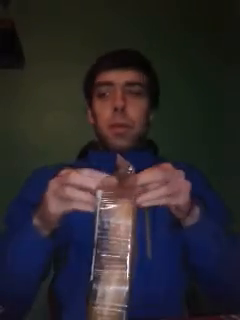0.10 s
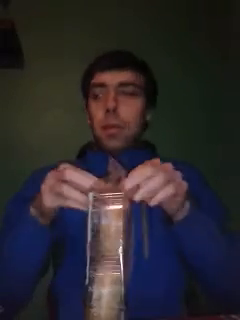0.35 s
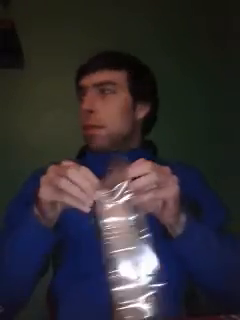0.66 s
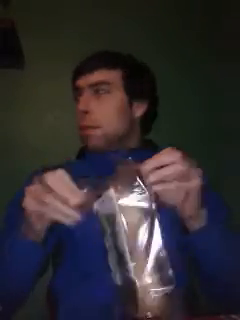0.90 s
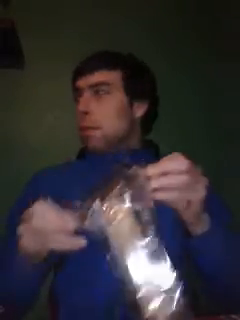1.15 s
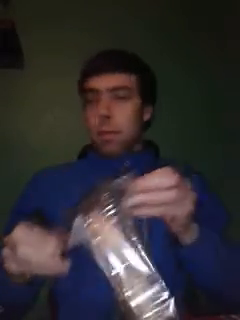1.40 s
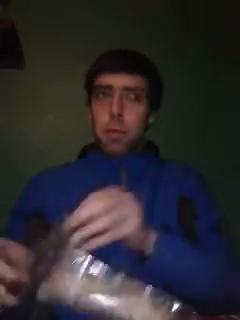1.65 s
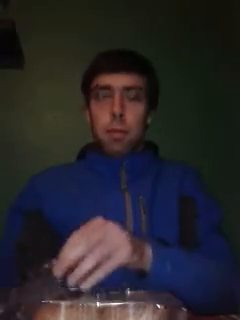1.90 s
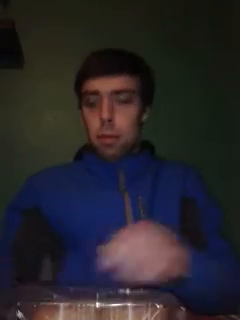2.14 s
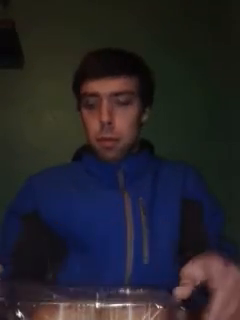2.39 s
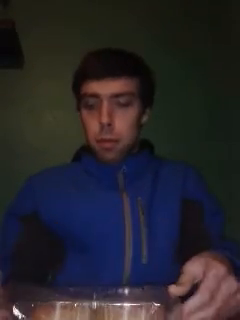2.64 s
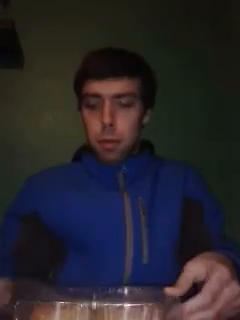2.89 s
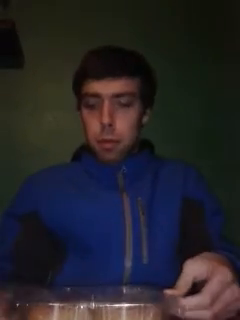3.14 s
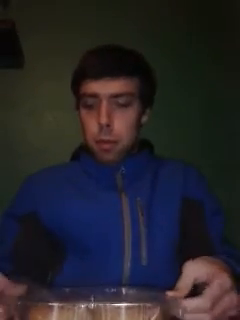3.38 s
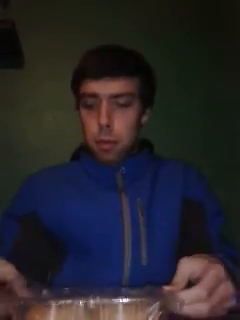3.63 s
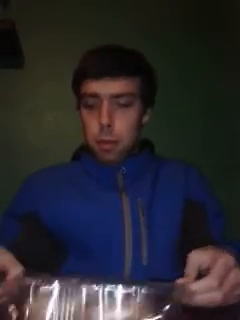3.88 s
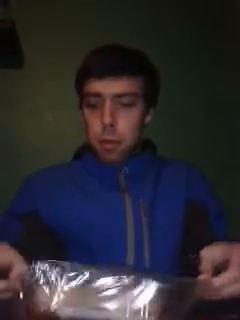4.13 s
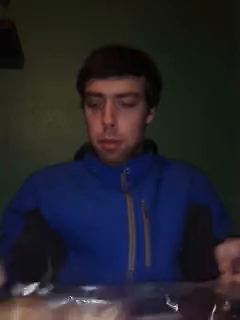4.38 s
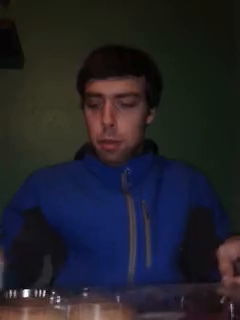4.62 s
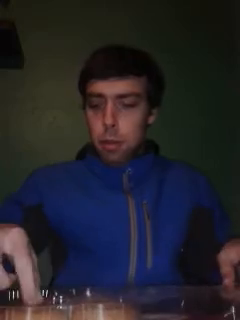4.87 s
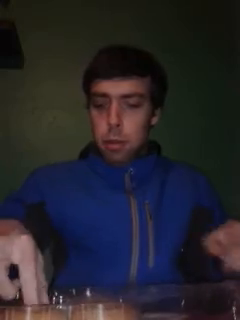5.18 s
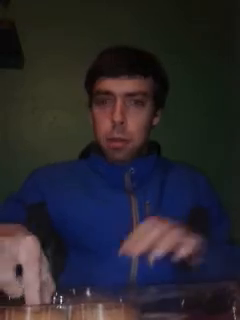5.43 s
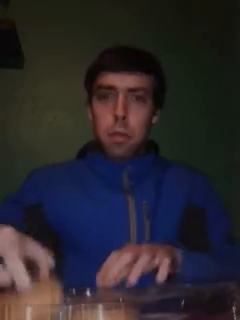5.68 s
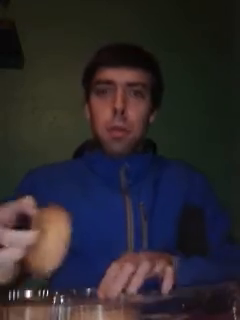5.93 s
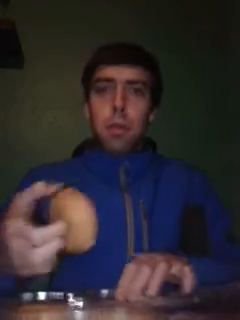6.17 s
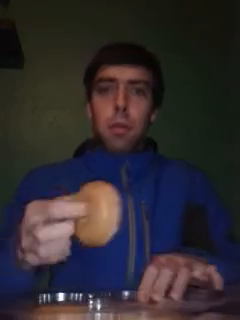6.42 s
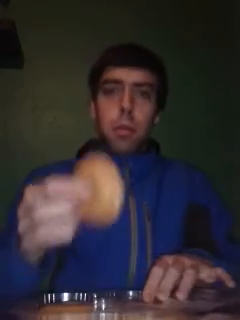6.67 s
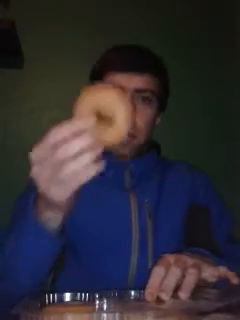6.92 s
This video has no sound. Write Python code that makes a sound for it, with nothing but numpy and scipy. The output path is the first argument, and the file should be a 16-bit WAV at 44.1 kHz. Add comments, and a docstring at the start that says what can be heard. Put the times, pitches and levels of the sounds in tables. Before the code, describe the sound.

Stiff plastic film is handled close to a cheap microphone in a small furnished room. From 0 to 0.6 s it crackles brightly with separate sharp snaps, then swells into harsh, dense crinkling, strongest around 1 s and clipping on the hardest snaps. Loose film flaps lower, most clearly near 1.65 s. Strong snapping returns at about 2.2 s, then softer, scattered rustling continues from 2.5 to 3.7 s. A second loud flurry runs from 3.8 to 4.5 s, then thins quickly. A small dull knock on the table comes at 4.9 s, with faint rocking taps after it. From 5.2 s almost nothing remains but low hiss; a very faint rough squeak slips by at 5.5 s. Light crackles return around 6 s, rise modestly near 6.35 s and fade by 7 s. The sound is narrow, gritty and hissy, with a short dull room tail.

```python
"""Stiff plastic film crackles and snaps as it is pulled open, laid on a table and handled in a small furnished
room. Creases buckle as short noise bursts: the big ones snap singly, the small ones make a dense crackle. Slack
film crackles and flaps lower down, slips give a faint rough squeak, and the pack lands on the table and rocks.
The film rustles faintly throughout, a dull room tail follows, and a narrow-band microphone chain samples slowly
and overloads on the loudest snaps."""
import sys
import numpy as np
from scipy import signal
from scipy.fft import rfft, irfft
from scipy.io import wavfile

SR = 44100
rng = np.random.default_rng(int(sys.argv[2]) if len(sys.argv) > 2 else 0)


def store_wav(level_fs):
    """Save 16-bit WAV to argv[1]."""
    pcm = np.round(np.clip(np.atleast_2d(level_fs), -1, 1) * 32767)
    wavfile.write(sys.argv[1], SR, pcm.T.astype(np.int16))


def how_loud(loudness_db):
    """Turn decibels into a plain amplitude multiplier (0 dB gives 1, 20 dB gives 10)."""
    steps = np.asarray(loudness_db, float) / 20
    return 10 ** steps


N = 310464


def in_time(rows):
    """Draws straight lines between the rows and returns each column at every sample."""
    time_s, *columns = np.transpose(rows)
    return [np.interp(np.arange(N) / SR, time_s, column) for column in columns]


def rms_one(x):
    """Scales a signal to unit power."""
    return x / np.sqrt(np.mean(x ** 2) + 1e-20)


def coloured(x, spectrum):
    """Filters with a short minimum-phase response that follows (frequency, gain) points."""
    hz, db = np.transpose(spectrum)
    grid = np.linspace(1, SR / 2, 1025)
    gain = how_loud(np.interp(np.log(grid), np.log(hz), db))
    # folding the cepstrum onto positive times makes the filter minimum-phase
    cepstrum = irfft(np.log(gain))
    cepstrum[1:1024] *= 2
    cepstrum[1025:] = 0
    response = irfft(np.exp(rfft(cepstrum)))
    return signal.fftconvolve(x, response)[:len(x)]


def resonance(x, hz, width_hz):
    """Passes a band through a two-pole resonance with a gain of about 1 on top."""
    r = np.exp(-np.pi * width_hz / SR)
    top = [(1 - r * r) / 2, 0, (r * r - 1) / 2]
    bottom = [1, -2 * r * np.cos(2 * np.pi * hz / SR), r * r]
    return signal.lfilter(top, bottom, x)


def low_pass(x, order, hz):
    """Removes what lies above a frequency with a Butterworth filter."""
    return signal.sosfilt(signal.butter(order, hz, fs=SR, output="sos"), x)


def drift(rate_hz):
    """Smooths noise into a slow random wander of unit power."""
    r = np.exp(-2 * np.pi * rate_hz / SR)
    wander = signal.lfilter([1], [1, -2 * r, r * r], rng.standard_normal(N + SR))
    return rms_one(wander[SR:])   # the first second lets the filter settle


# How the hands hold the film between pulls:
# (time [s], steady crackle level [dB], slack film level relative to the whole crackle [dB])
GRIP_CURVE = [(0, -24, -18), (0.45, -26, -20), (0.7, -21, -19), (1.1, -21, -16), (1.3, -21, -17),
              (1.5, -31, -14.5), (2.3, -26, -17.5), (2.55, -30, -15), (2.75, -32, -18), (2.96, -38, -18),
              (3.1, -31, -17.5), (3.5, -34, -14), (3.7, -38, -15), (4.16, -40, -20), (4.55, -34, -12.5),
              (4.78, -36, -18), (5.0, -44, -14), (5.2, -48, -18), (5.42, -66, -19), (5.62, -66, -18),
              (5.9, -41, -17), (6.5, -34, -17), (6.6, -48, -17), (7.04, -41, -17)]
# Pulls and squeezes that swell the crackle:
# (time of the top [s], top level [dB], time to gain the last 10 dB [s], time to lose the first 10 dB [s])
PULL_EVENTS = [(.054, -20, .05, .025), (.15, -21, .06, .08), (.225, -21, .08, .04), (.321, -23, .06, .15),
               (.482, -16, .012, .16), (.643, -15, .05, .08), (.81, -14, .1, .06), (1.003, -3, .01, .09),
               (1.065, -3.5, .08, .018), (1.125, -11, .06, .07), (1.31, -15, .12, .06),
               (1.39, -9.5, .1, .045), (1.658, -14, .1, .16), (1.96, -19, .06, .1), (2.091, -20, .04, .1),
               (2.197, -8, .02, .015), (2.24, -20, .08, .1), (2.387, -18, .3, .08), (2.53, -25, .08, .2),
               (2.778, -25, .08, .08), (2.88, -23, .1, .045), (3.04, -26, .06, .05), (3.129, -19, .12, .08),
               (3.215, -18, .025, .12), (3.312, -19, .06, .06), (3.446, -18, .07, .09),
               (3.632, -24, .08, .055), (3.738, -21, .02, .035), (3.865, -11, .02, .06),
               (3.91, -10, .05, .09), (4.051, -14, .08, .025), (4.25, -8, .03, .04), (4.3, -12, .05, .06),
               (4.41, -5.5, .025, .08), (4.47, -7.5, .05, .07), (4.55, -15, .07, .07),
               (4.745, -30, .1, .04), (4.851, -24, .02, .07), (5.17, -37, .05, .07),
               (5.705, -46, .045, .12), (5.851, -38, .02, .2), (5.994, -25, .03, .09), (6.36, -26, .2, .15)]


def handling():
    """Adds the power of the grip and of every pull, each swelling and dying at its own pace, in dB."""
    t = np.arange(N) / SR
    power = how_loud(in_time(GRIP_CURVE)[0]) ** 2
    for top_s, top_db, rise_s, fall_s in PULL_EVENTS:
        tens_below = np.where(t < top_s, (top_s - t) / rise_s, (t - top_s) / fall_s)
        power = power + how_loud(top_db - 10 * tens_below) ** 2
    return 10 * np.log10(power)


def buckle(t60_s, size=700):
    """One crease lets go: a burst of noise that rises at once and dies away (size in samples)."""
    age = np.arange(size) / SR
    rise = 1 - np.exp(-age / 0.00042)
    return rng.standard_normal(size) * how_loud(-60 * age / t60_s) * rise


def crackle(per_s, spectrum, facets_hz, t60_s, spread_db, clump_db, smooth_db, count=40):
    """Small creases come in clumps, each on a facet of its own pitch, over the blur of countless tiny ones."""
    born = rng.random(N) < per_s * how_loud(clump_db * drift(25.0)) / SR
    sizes = born * how_loud(spread_db * np.minimum(rng.exponential(1, N), 3.0))
    facet_of = rng.integers(0, count, N)
    grains = 0
    for k, hz in enumerate(np.geomspace(*facets_hz, count)):
        burst = buckle(t60_s)
        grain = burst + 1.2 * resonance(burst, hz, hz / 1.4)
        grains = grains + signal.oaconvolve(sizes * (facet_of == k), grain)[:N]
    blur = rng.standard_normal(N) * how_loud(smooth_db + clump_db / 2 * drift(40.0))
    return rms_one(coloured(rms_one(grains) + blur, spectrum))


CREASES_PER_S = 700   # before clumping
# Colour of the taut film's crackle: (frequency [Hz], filter gain [dB])
TAUT_COLOUR = [(710, -20), (1200, -22.5), (1670, -6.5), (2340, -1.5), (2910, -3.5), (4070, -4), (6900, 3),
               (8970, -32.5), (15200, -120)]


def taut_crackle(taut_db):
    """Tight film buckles in many short, bright creases that follow the handling."""
    texture = crackle(CREASES_PER_S, TAUT_COLOUR, (2000, 7000), t60_s=0.0096,
                      spread_db=4.0, clump_db=2.5, smooth_db=-4.5)
    return how_loud(taut_db) * texture


# Colour of the slack film's crackle: (frequency [Hz], filter gain [dB])
SLACK_COLOUR = [(120, -54.5), (200, -19.5), (280, -13), (449, -6), (501, -2.5), (1500, -3), (1950, -34),
                (3300, -120)]


def slack_crackle(taut_db):
    """Loose film buckles more rarely and lower, and fades less than the taut film in quiet handling."""
    texture = crackle(CREASES_PER_S / 4, SLACK_COLOUR, (400, 1400), t60_s=0.016,
                      spread_db=3.0, clump_db=2.0, smooth_db=4.0)
    # below -25 dB the slack film keeps half of every dB that the handling loses
    kept_db = 0.5 * np.maximum(-25 - taut_db, 0)
    return how_loud(taut_db) * how_loud(in_time(GRIP_CURVE)[1] + kept_db) * texture


def bursts(events, t60_s, sharpness, broad_db, broad_hz):
    """Each burst rings around the pitch of its facet, on a wide crack."""
    out = np.zeros(N + SR)
    for time_s, peak_db, hz in events:
        burst = buckle(t60_s, size=1400)
        crack = resonance(resonance(burst, broad_hz, 2 * broad_hz), broad_hz, 2 * broad_hz)
        ring = resonance(burst, hz, hz / sharpness)
        sound = low_pass(ring + how_loud(broad_db) * crack, 8, 7200)
        i = round(time_s * SR)
        out[i:i + len(sound)] += how_loud(peak_db) * sound / abs(sound).max()
    return out[:N]


def middling(taut_db, count=60):
    """Draws creases between big and small: any moment, any facet, as strong as the handling allows."""
    when, facet, size = rng.random((count, 3)).T
    # peaks lie 13 dB over the handling level, give or take 4 dB
    peak_db = taut_db[(when * N).astype(int)] + 13 + 4 * (2 * size - 1)
    return zip(when * N / SR, np.minimum(peak_db, -4), 2000 + 4900 * facet)


# Big creases: (time [s], peak level [dB], centre frequency [Hz])
BIG_CREASES = [(.098, -5, 5860), (.1152, 0, 5810), (.1656, -5, 6550), (.2811, -7, 3320), (.3173, -4, 5640),
               (.3255, -4, 6800), (.3487, -4, 2670), (.3589, 0, 5730), (.3996, -6, 6630), (.4288, -7, 3060),
               (.4734, 2, 2450), (.5006, 3, 5430), (.5455, -2, 3270), (.6074, -4, 3140), (.644, 1, 5600),
               (.6795, 0, 2800), (.7545, 2, 4740), (.7969, 2, 5000), (.8064, 3, 2410), (.8366, 3, 6760),
               (.8556, -2, 2540), (.8807, 3, 6370), (.888, 3, 4570), (.9229, 0, 6030), (.9284, 4, 5900),
               (.9807, 4, 5240), (1.1119, 4, 6090), (1.1671, 0, 5900), (1.2242, 2, 2200), (1.2312, 1, 3960),
               (1.2821, 2, 6420), (1.3015, 3, 4690), (1.3083, 4, 3400), (1.3563, 4, 5440),
               (1.3896, 4, 2500), (1.5176, 3, 6800), (1.5547, 1, 5860), (1.5702, -2, 6590),
               (1.6458, 2, 1420), (1.665, 4, 6070), (1.6869, 1, 2890), (1.7044, 2, 6720), (1.7468, 1, 2150),
               (1.762, 1, 6500), (1.78, 1, 6850), (1.9024, -6, 6760), (1.9214, -6, 6630),
               (1.9329, -5, 2070), (1.9408, -4, 5730), (1.9665, 4, 5170), (2.1219, -1, 6850),
               (2.1376, 3, 6030), (2.1691, 2, 6590), (2.2541, 2, 3530), (2.2696, -1, 5940),
               (2.293, 1, 6800), (2.3818, 2, 6800), (2.4148, 0, 6330), (2.4893, -7, 6720),
               (2.5078, -4, 6630), (2.5175, 0, 6760), (2.5674, -7, 5810), (2.6225, -1, 4220),
               (2.7123, -7, 4090), (2.7627, -8, 4130), (2.7912, -5, 5640), (2.8453, -5, 2410),
               (2.8667, -7, 2970), (2.8984, -7, 3880), (2.9161, -9, 4220), (2.9805, -9, 5000),
               (2.9974, -2, 3660), (3.0072, -5, 5730), (3.0448, 0, 4390), (3.0585, -4, 6240),
               (3.1234, -1, 3100), (3.1551, -5, 3880), (3.2112, -4, 2670), (3.2369, -5, 3750),
               (3.2466, -4, 4650), (3.313, -5, 5560), (3.3262, -4, 5380), (3.3968, -5, 6630),
               (3.4185, -7, 6160), (3.4402, 0, 4130), (3.4821, -3, 3400), (3.5108, -8, 6890),
               (3.5751, -8, 6200), (3.6233, -5, 3360), (3.7133, -10, 5940), (3.7265, -5, 5040),
               (3.8188, -5, 6030), (3.845, 4, 5040), (3.8585, 3, 4610), (3.9602, 3, 3190),
               (4.0401, 4, 5510), (4.0628, 1, 2330), (4.0982, -2, 6420), (4.1057, -4, 5120),
               (4.158, -9, 5600), (4.176, -9, 4610), (4.1945, 3, 5510), (4.2107, 2, 5900),
               (4.2182, 0, 5120), (4.2304, 4, 4010), (4.2902, 3, 5300), (4.3386, 3, 2410),
               (4.3688, 3, 5730), (4.3883, 4, 4180), (4.5901, -5, 5080), (4.6355, -6, 6160),
               (4.7008, -9, 5380), (4.7332, -5, 6760), (4.7492, -4, 4090), (4.7567, -7, 2450),
               (4.8188, -12, 5560), (4.8388, -8, 3920), (4.8774, -9, 4350), (4.9098, -2, 5380),
               (4.9355, -6, 2670), (5.0054, -20, 2450), (5.0328, -12, 5680), (5.076, -19, 4090),
               (5.1037, -16, 4350), (5.1917, -11, 5860), (5.2039, -16, 6760), (5.6898, -18, 2240),
               (5.7015, -20, 6160), (5.7816, -28, 4310), (5.834, -24, 2580), (5.8445, -21, 5510),
               (5.894, -20, 6400), (5.9804, -12, 3960), (5.9984, -13, 5770), (6.0552, -15, 3960),
               (6.1213, -13, 1890), (6.1331, -12, 3700), (6.1667, -13, 2330), (6.2154, -12, 2540),
               (6.3092, -7, 6030), (6.3179, -10, 2200), (6.3548, -8, 5510), (6.3798, -5, 6160),
               (6.387, -8, 2800), (6.4094, -11, 5680), (6.5304, -16, 4350), (6.5494, -16, 5940)]


def snaps(taut_db):
    """Big and middling creases let go one by one as short, bright snaps."""
    events = [*BIG_CREASES, *middling(taut_db)]
    return bursts(events, t60_s=0.0074, sharpness=3.2, broad_db=-1.5, broad_hz=3770)


# Flaps of the slack film: (time [s], peak level [dB], centre frequency [Hz])
FLAP_EVENTS = [(0.645, -11.5, 954), (0.677, -8.5, 630), (0.733, -20, 720), (0.887, -16, 969),
               (0.984, -12, 990), (1.222, -23, 1240), (1.304, -17, 961), (1.362, -10, 980),
               (1.645, -2.5, 912), (1.664, -1, 1250), (1.964, -18.5, 665), (2.184, -18, 891),
               (2.419, -13.5, 1070), (3.208, -15, 1100), (3.443, -14.5, 622), (3.592, -19, 980),
               (3.845, -20, 1040), (3.958, -13, 760), (4.232, -24, 1120), (4.386, -17, 762),
               (4.44, -18, 1030), (6.317, -14.5, 694)]


def flaps():
    """Slack film flaps in longer, lower bursts."""
    return bursts(FLAP_EVENTS, t60_s=0.025, sharpness=1.7, broad_db=-7, broad_hz=1000)


# Pitches that every slip of the squeak rings: (frequency [Hz], relative level [dB])
SLIP_RINGS = [(1960, 0), (2520, -9), (3290, 1)]


def squeak(count=4):
    """A few uneven slips ring the same sharp pitches, a faint rough squeak."""
    start_s, gap_s, peak_db = 5.515, 0.014, -46   # the gap and the peak vary by chance
    slips = []
    for k in range(count):
        slip_s = start_s + gap_s * k
        for db, hz in [(db, hz) for hz, db in SLIP_RINGS]:
            time_s = slip_s + gap_s * rng.uniform(-.3, .3)
            slips.append((time_s, peak_db + db + rng.normal(0, 2.5), hz))
    return bursts(slips, t60_s=0.046, sharpness=40.0, broad_db=-38, broad_hz=2500)


# The pack lands on the table and rocks: (time [s], level [dB])
TABLE_BLOWS = [(4.905, -23.5), (4.975, -44), (5.0, -42), (5.04, -45)]
# Modes of the table: (frequency [Hz], relative level [dB], time to fall by 60 dB [s])
TABLE_MODES = [(172, -16, .08), (387, 0, .12), (564, -1, .13), (670, 1, 0.065), (744, -14, 0.22),
               (1060, -9, 0.09)]


def table_knocks():
    """Every blow sets the same table modes ringing as fading sines."""
    out, t = np.zeros(N), np.arange(N) / SR
    for time_s, level_db in TABLE_BLOWS:
        age = np.maximum(t - time_s, 0)   # a sine at age 0 is silent
        for hz, db, t60_s in TABLE_MODES:
            out += how_loud(level_db + db - 60 * age / t60_s) * np.sin(2 * np.pi * hz * age)
    return out


def room(x):
    """Reflections form a dull, dense tail of fading noise that starts after 4 ms."""
    t60_s, level_db, wall_cut_hz = 0.4, -15, 10000
    age = np.arange(SR // 2) / SR
    tail = rng.standard_normal(len(age)) * how_loud(-60 * age / t60_s) * (age > .004)
    tail = signal.lfilter(*signal.butter(1, wall_cut_hz, fs=SR), tail)
    tail = tail / np.sqrt(np.sum(tail ** 2))
    return how_loud(level_db) * signal.fftconvolve(x, tail)[:N]


# Colour of the rustle: (frequency [Hz], filter gain [dB])
RUSTLE_COLOUR = [(59, -67.5), (100, -32.5), (256, -21.5), (346, -6), (427, -11.5), (1190, -13), (2300, -0.5),
                 (4280, -4), (6900, -1), (8970, -41), (15200, -120)]
# The rustle sinks in the lull and swells again, before the band edges: (time [s], level [dB])
RUSTLE_CURVE = [(0, -41), (5.2, -58), (5.45, -55.5), (5.9, -45), (6.6, -37.5), (7.04, -46.5)]


def rustle():
    """The film rustles faintly: coloured noise whose level sinks and swells."""
    noise = rms_one(coloured(rng.standard_normal(N), RUSTLE_COLOUR))
    return how_loud(in_time(RUSTLE_CURVE)[0]) * noise


def band_edges(x):
    """The narrow-band chain passes only 193 to 7130 Hz."""
    x = signal.sosfilt(signal.butter(4, 193, "high", fs=SR, output="sos"), x)
    return low_pass(x, 24, 7130)


def mirror_image(x):
    """Slow sampling at 16 kHz leaves a weaker mirror image: f folds to 16 kHz - f."""
    sampling_hz, level_db = 16000, -10.5
    mirror = x * 2 * np.cos(2 * np.pi * sampling_hz * np.arange(N) / SR)
    mirror = low_pass(mirror, 30, 8300)
    return how_loud(level_db) * mirror


def dull_output(x):
    """The output softens the treble and stops near 16 kHz; both filters run forwards and backwards."""
    x = signal.sosfiltfilt(signal.butter(1, 15070, fs=SR, output="sos"), x)
    return signal.sosfiltfilt(signal.cheby2(16, 35, 16100, fs=SR, output="sos"), x)


def rumble():
    """A faint slow wander of the signal on a small constant offset."""
    return how_loud(-71) * drift(18.0) - .0011


def scene():
    """Film and table, direct and through the room."""
    taut_db = handling()
    near = taut_crackle(taut_db) + slack_crackle(taut_db)
    near += snaps(taut_db) + flaps() + squeak()
    near += table_knocks()
    return (near + room(near))[None]


def top_cut(x):
    """Nothing passes above the cut-off."""
    return signal.sosfilt(signal.butter(12, 16610, fs=SR, output="sos"), x)


def record(dry):
    """Rustle, band edges and the mirror image, then hard overload, a dull output and rumble."""
    x = band_edges(dry[0] + rustle())
    x = np.clip(x + mirror_image(x), -.71, .71)   # hard overload
    mix = dull_output(x) + rumble()
    return top_cut(mix[None])


dry = scene()
out = record(dry)
store_wav(out)
```